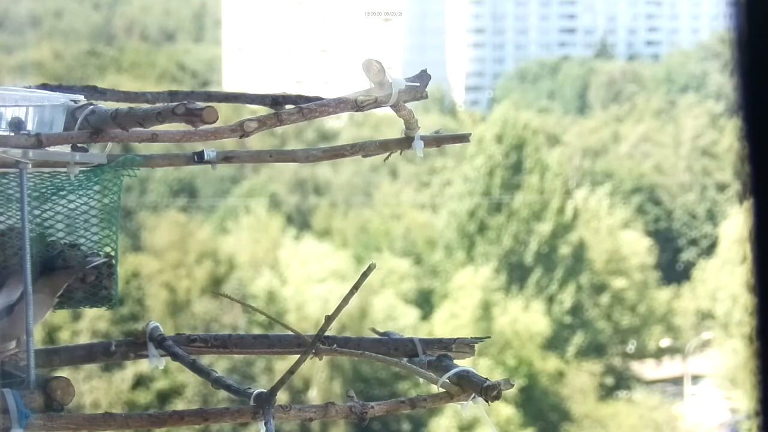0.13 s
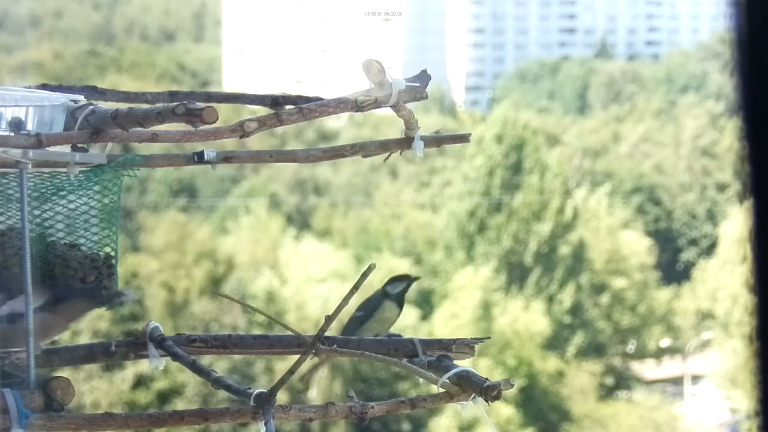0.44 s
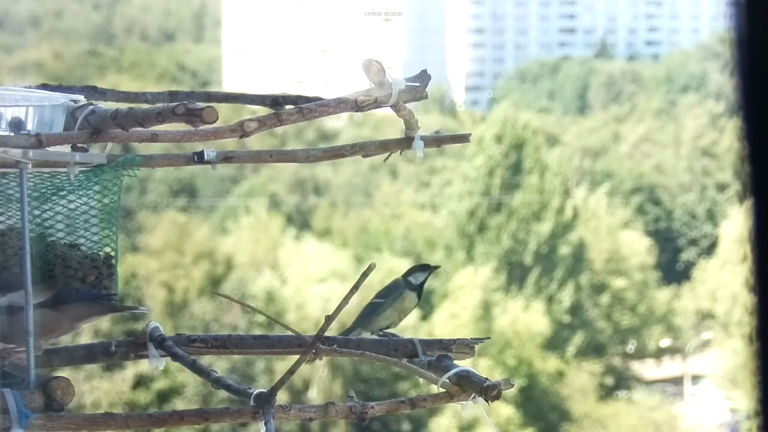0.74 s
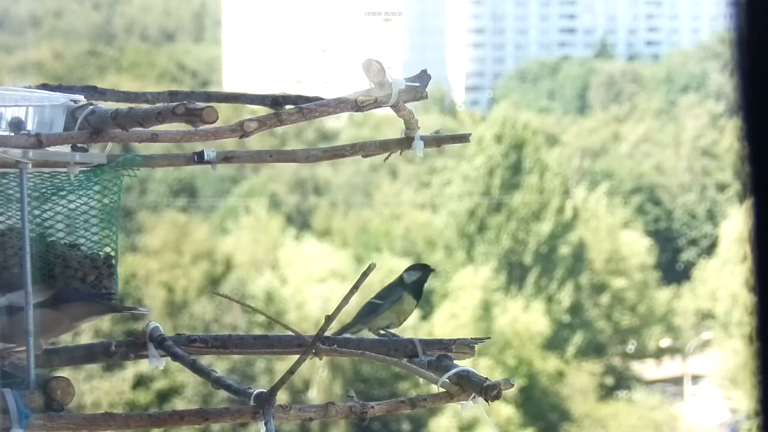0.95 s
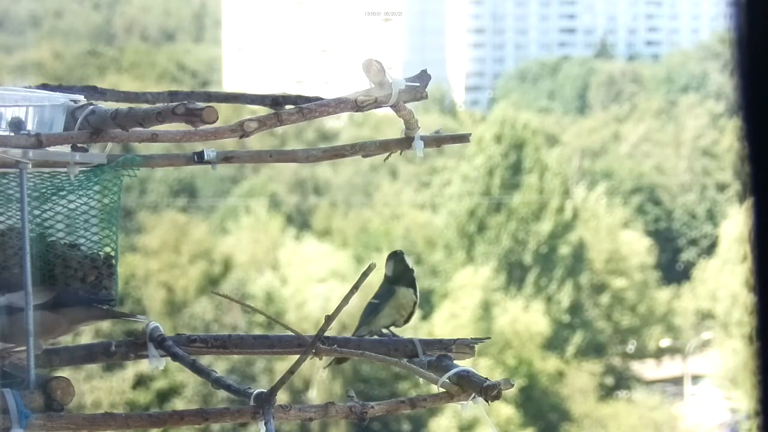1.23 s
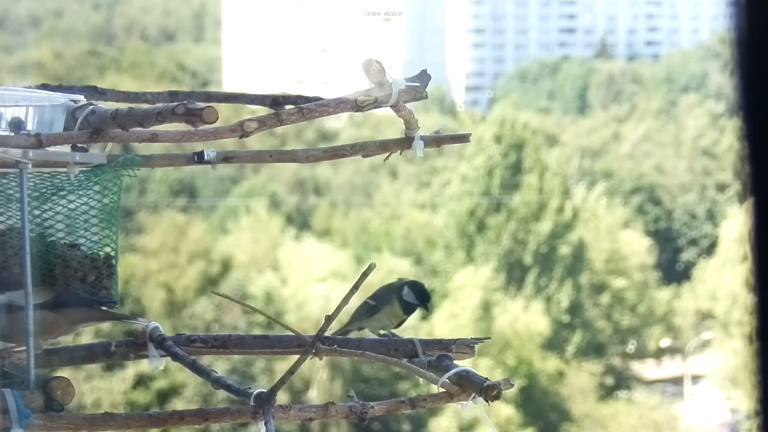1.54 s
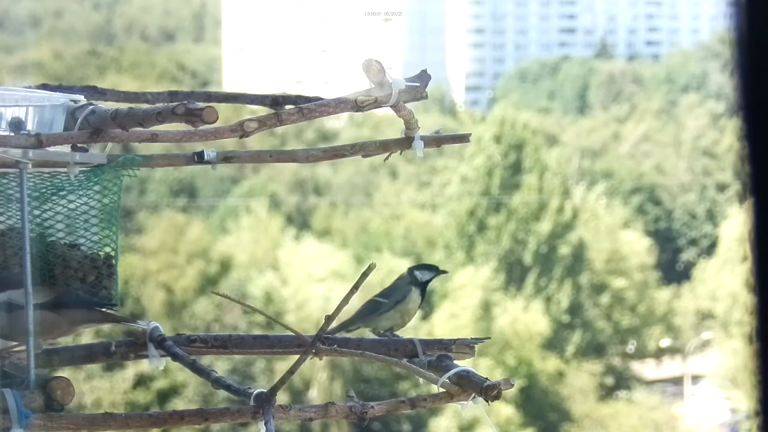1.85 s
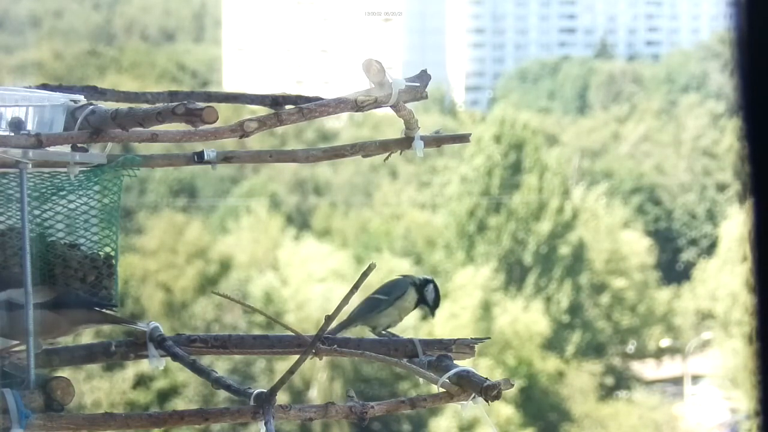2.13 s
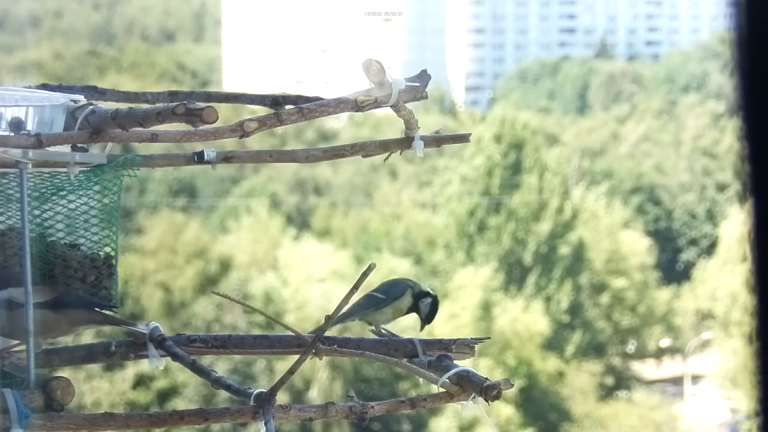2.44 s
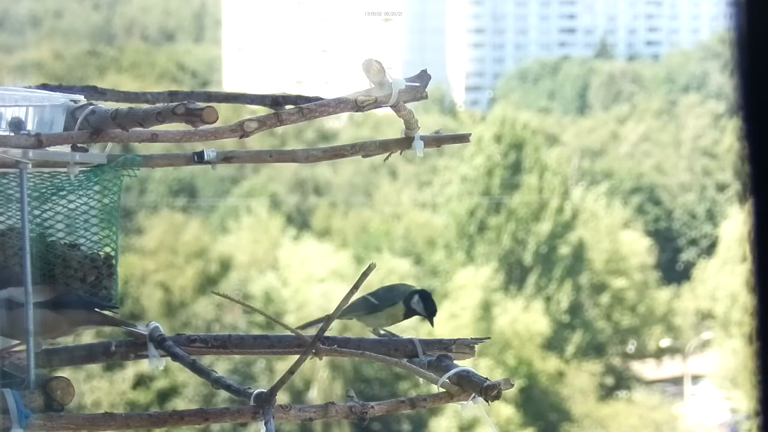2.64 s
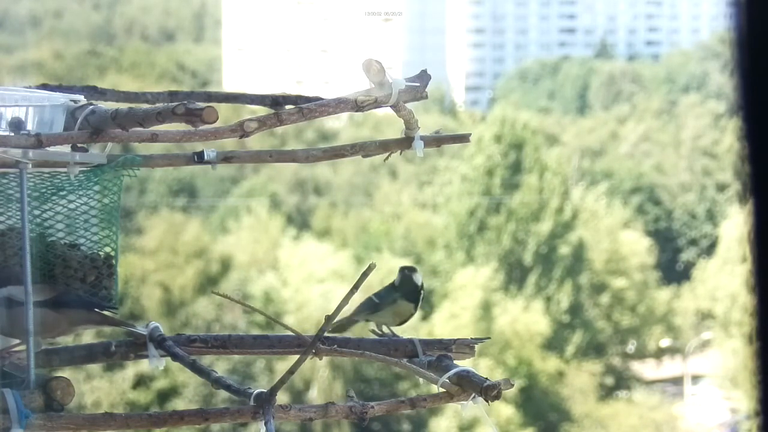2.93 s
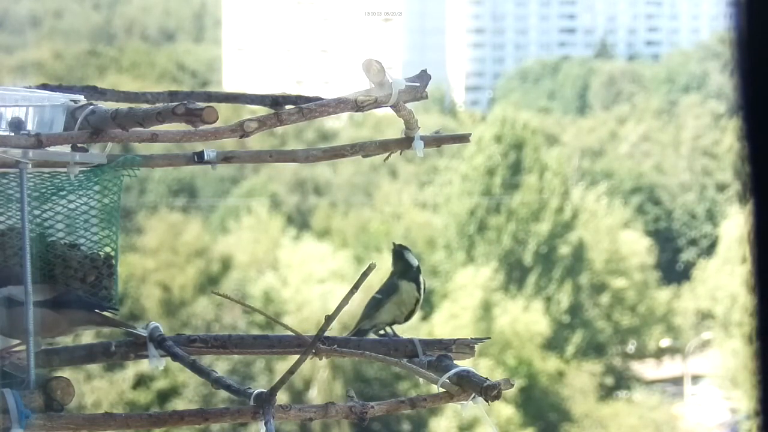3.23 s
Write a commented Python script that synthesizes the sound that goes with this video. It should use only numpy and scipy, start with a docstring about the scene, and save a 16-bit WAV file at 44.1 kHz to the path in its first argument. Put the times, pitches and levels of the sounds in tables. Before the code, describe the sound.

Small birds' beaks and claws tap sharply on a wooden feeder, hard knocks scattered among faint ticks and scratches; brief wing flutter late, then a hull crack. Close microphone outdoors, soft town murmur and hiss behind.

```python
"""Small birds at a wooden seed feeder

Beaks and claws tap close by as short filtered clicks; hulls splinter in dying runs of cracks, claws scratch.
Wings brush the feeder as grains through resonances. Behind lie shaped-noise town murmur and hiss, a faint hum
from a gliding sine and thin far bird calls from narrow noise. A limiter ducks everything after the sharpest taps.
"""
import sys
import numpy as np
from scipy import signal
from scipy.fft import rfft, irfft
from scipy.io import wavfile
from scipy.ndimage import uniform_filter1d, minimum_filter1d

SR = 44100
rng = np.random.default_rng(int(sys.argv[2]) if len(sys.argv) > 2 else 0)


def to_wav(sig):
    """Store sig (one row per channel, or 1-D mono) as 16-bit WAV at the path in sys.argv[1].

    Samples outside -1..1 are clipped; the rate is SR.
    """
    pcm = np.clip(np.atleast_2d(sig), -1, 1) * 32767
    pcm = np.round(pcm).astype(np.int16)
    wavfile.write(sys.argv[1], SR, pcm.T)  # frames by channels


N = 147735


def amp(db):
    """Turns dB into a linear factor."""
    return 10 ** (np.asarray(db) / 20)


def evened(x):
    """Scales to rms 1."""
    return x / np.sqrt(np.mean(x ** 2) + 1e-20)


def read(points, hz):
    """Reads a spectrum curve in dB on a log-frequency axis."""
    f, db = np.transpose(points)
    return np.interp(np.log(hz + 1), np.log(f + 1), db)


def add(mix, s, sound):
    """Mixes a sound in at time s, cutting whatever falls outside."""
    at = round(s * SR)
    sound = sound[max(-at, 0):]
    part = mix[max(at, 0):][:len(sound)]
    part += sound[:len(part)]


def colour(x, points):
    """Filters by a spectrum, keeping the power of white noise."""
    gain = evened(amp(read(points, np.fft.rfftfreq(len(x), 1 / SR))))
    return irfft(rfft(x) * gain, len(x))


def resonate(x, hz, width):
    """A resonance of gain 1 that can follow a pitch curve: shift to 0 Hz, smooth, shift back."""
    turn = np.exp(2j * np.pi * np.cumsum(hz * np.ones(len(x))) / SR)
    r = np.exp(-np.pi * width / SR)
    smoothed = signal.lfilter([1 - r], [1, -r], x / turn + 1e-18)
    return 2 * (turn * smoothed).real


def arch(length):
    """Half a sine, length seconds long."""
    return np.sin(np.linspace(0, np.pi, int(length * SR))).clip(0)


def strokes(rows):
    """Level curve of a set of strokes, each swelling and fading."""
    level = np.zeros(N)
    for start, length, db in rows:
        add(level, start, amp(db) * arch(length) ** 0.28)
    return level


def grains(rate, spread_db):
    """Random tiny impacts of uneven size and either sign, at a mean rate per second."""
    size = amp(spread_db * np.minimum(rng.exponential(1, N), 4))
    hits = rng.random(N) < rate / SR
    return evened(size * rng.choice([-1, 1], N) * hits)


def drift(count):
    """Slow random wandering, about rms 1."""
    smooth = uniform_filter1d(rng.standard_normal(N), size=700)
    return evened(uniform_filter1d(smooth, size=400))[:count]


def patchy(x):
    """Lets narrow bands of a noise swell and thin at random."""
    depth_db, frames, bins = 2, 9, 8
    z = signal.stft(x, nperseg=512, noverlap=384)[2]
    patches = uniform_filter1d(rng.standard_normal(z.T.shape).T, size=frames, axis=1)
    patches = uniform_filter1d(patches, size=bins, axis=0)
    z = z * amp(depth_db * evened(patches))
    return evened(signal.istft(z, nperseg=512, noverlap=384)[1][:N])


def murmur_and_hiss():
    """Town murmur as steady coloured noise, and hiss whose narrow bands flicker."""
    # Spectrum of the town murmur. Each row: frequency in Hz, relative level in dB per Hz.
    town_curve = [(18, -65), (54, -30), (355, -8), (439, -7.5), (650, -8.5), (995, 1.5), (1280, -5.5),
                  (1420, -6.5), (2100, -26), (2730, -56)]
    # Spectrum of the hiss. Each row: frequency in Hz, relative level in dB per Hz.
    hiss_curve = [(1800, -36), (2400, -18.5), (3000, -13), (3900, -5), (5500, -2), (7300, -4.5),
                  (8200, -11.5), (9300, -12), (11000, -14.5), (15300, -14)]
    town_db, hiss_db = -54, -48
    town, hiss = rng.standard_normal((2, N))
    return amp(town_db) * colour(town, town_curve) + amp(hiss_db) * patchy(colour(hiss, hiss_curve))


def hums():
    """Distant hum: a sine that sinks towards its last pitch while its level wavers."""
    # Swells of hum. Each row: start in seconds, length in seconds, first pitch in Hz,
    # pitch it settles towards in Hz, level in dB ahead of the background fader.
    hum_rows = [(-.08, 0.32, 450, 364.3, -59.5), (1.9, 0.54, 443, 366, -60)]
    settle_s, waver = .15, .6
    out = np.zeros(N)
    for start, length, first_hz, last_hz, db in hum_rows:
        swell = arch(length)
        t = np.arange(len(swell)) / SR
        pitch = last_hz + (first_hz - last_hz) * np.exp(-t / settle_s)
        tone = np.sin(2 * np.pi * np.cumsum(pitch) / SR)
        add(out, start, amp(db) * swell * evened(tone * (1 + waver * drift(len(swell)))))
    return out


def far_calls():
    """Thin, fuzzy far bird calls: noise through a narrow resonance whose pitch arches up and down."""
    # The calls. Each row: start in seconds, length in seconds, top pitch in Hz,
    # level in dB ahead of the background fader.
    call_rows = [(0.543, 0.35, 3650, -57.5), (1.634, .28, 3700, -53.5), (2.683, 0.32, 3690, -50.5)]
    dip, width_hz = 0.022, 380  # dip: share by which the pitch starts and ends below its top
    out = np.zeros(N)
    for start, length, top_hz, db in call_rows:
        swell = arch(length)
        pitch = top_hz * (1 - dip * (1 - swell))
        whistle = resonate(rng.standard_normal(len(swell)), pitch, width_hz)
        whistle = resonate(whistle, pitch, width_hz)
        add(out, start, amp(db) * swell * evened(whistle))
    return out


def distance():
    """Everything far away, riding on one slow background fader."""
    # Background fader. Each row: time in seconds, gain in dB.
    fader = [(0, -18.5), (.03, -7.5), (.07, -0.5), (2.0, 0.5), (2.6, 2), (2.8, 0)]
    gain_db = np.interp(np.arange(N) / SR, *np.transpose(fader))
    return (murmur_and_hiss() + hums() + far_calls()) * amp(gain_db)


def wings():
    """Feathers brush the feeder in rough strokes, each ringing its resonances a little differently."""
    # Wing strokes. Each row: start in seconds, length in seconds, level in dB, treble tilt in dB.
    wing_rows = [(0.431, 0.024, -48, -12), (2.121, 0.038, -51.5, -21), (2.442, .02, -47.5, 2),
                 (2.48, 0.025, -45.5, -8), (2.522, 0.034, -38.5, 3), (2.571, 0.012, -41, -1),
                 (2.585, 0.027, -45, -8)]
    # Resonances of the brushed feeder. Each row: nominal frequency in Hz,
    # width in Hz (doubled in each of two passes), relative level in dB ahead of the tilt.
    feeder_modes = [(495, 83, -3), (753, 165, -5), (1072, 48, 6.5), (1700, 110, -7.5), (2500, 120, -6),
                    (3220, 157, 4.5), (3630, 260, -10)]
    feathers_per_s, spread_db = 1500, 2.04
    pitch_shift, treble_hz = .018, 1000  # each stroke lands elsewhere and shifts the resonances
    out = np.zeros(N)
    for start, length, db, treble_db in wing_rows:
        swell = np.pad(arch(length) ** .5, (0, 1024))  # room to ring out
        brush = grains(feathers_per_s, spread_db)[:len(swell)] * swell
        ring = 0
        for hz, width, mode_db in feeder_modes:
            pitch = hz * (1 + pitch_shift * rng.standard_normal())
            # the tilt fades in over the octave around treble_hz
            tilt_db = treble_db * np.clip(np.log2(hz / treble_hz) + .5, 0, 1)
            mode = resonate(resonate(brush, pitch, 2 * width), pitch, 2 * width)
            ring += amp(mode_db + tilt_db) * mode
        add(out, start, amp(db) * ring * np.linalg.norm(swell) / np.linalg.norm(ring))
    return out


def claws():
    """Claws catch and slip over wood in short bursts of tiny impacts; seeds tick faintly throughout."""
    # Claw scratches. Each row: start in seconds, length in seconds, level in dB.
    scratch_rows = [(.044, 0.014, -46), (.191, 0.0027, -36.5), (.422, 0.031, -45), (.503, 0.018, -37),
                    (.579, 0.018, -33), (.622, .012, -39), (.805, 0.04, -41.5), (1.33, 0.011, -37),
                    (1.456, 0.0047, -33), (1.615, 0.082, -50), (1.835, 0.046, -43.5), (1.935, 0.037, -39.5),
                    (2.12, 0.046, -45), (2.308, 0.02, -33.5), (2.382, 0.015, -38), (2.45, 0.035, -40),
                    (2.52, 0.028, -37.5), (2.58, 0.017, -32), (2.648, 0.036, -40.5), (2.722, 0.027, -40),
                    (2.798, 0.021, -41.5), (2.874, 0.017, -32.5)]
    # Spectrum of scratches and ticks. Each row: frequency in Hz, relative level in dB.
    scratch_curve = [(1000, -23.5), (2000, -19), (3000, -14.5), (4500, -2.5), (6000, 8), (7500, 4.5),
                     (9500, -1), (12000, -23.5), (16000, -18)]
    slips_per_s, slip_spread_db = 1800, 3
    ticks_per_s, tick_spread_db, ticks_db = 70, 2.5, -59
    slips = grains(slips_per_s, slip_spread_db) * strokes(scratch_rows)
    ticks = amp(ticks_db) * grains(ticks_per_s, tick_spread_db)
    return colour(slips + ticks, scratch_curve)


def thump():
    """One short, dull push of air under a hard tap: a one-sided pulse that jumps up and decays."""
    # The pulse: start in seconds, level in dB (it peaks 6 dB lower), time scale in seconds.
    s, db, length = (.25, -18, 0.00016)
    out = np.zeros(N)
    u = np.arange(1024) / SR / length
    add(out, s, amp(db) * u * np.exp(1 - 2 * u))
    return out


def click(db, centre, width, crack_db, body_db):
    """One contact: a very short ring with a hard crack and a woody body, coloured by the spot struck."""
    # Spectrum of the woody body. Each row: frequency in Hz, level in dB ahead of the tap's own body level.
    body_curve = [(100, -37), (900, -11), (2000, -16.5), (2900, -8), (4500, -2), (9000, -17.5)]
    # Spectrum of the hard crack. Each row: frequency in Hz, level in dB ahead of the tap's own crack level.
    crack_curve = [(2000, -48), (5500, -7), (10000, -1.5), (12000, -4), (15000, 2.5), (17000, -11)]
    spot_db, spot_width_hz = 3.5, 701  # every struck spot has resonances of its own
    contact_s = .00007  # soft meeting of beak and wood: each frequency is delayed by about twice this
    trim_db = 1  # of all contacts
    hz = abs(np.fft.fftfreq(2048, 1 / SR))
    ring = 1 / (1 + ((hz - centre) / width) ** 4)
    body = amp(body_db + read(body_curve, hz))
    crack = amp(crack_db + read(crack_curve, hz))
    spot = np.interp(hz / spot_width_hz, np.arange(128), rng.standard_normal(128))
    gain = (ring + body + crack) * amp(spot_db * spot)
    build_up = np.exp(-2j * np.pi * np.cumsum(np.diff(hz, prepend=0) * contact_s * (2 + spot)))
    # minimum phase puts the energy as early as the spectrum allows
    spectrum = np.exp(np.conj(signal.hilbert(np.log(gain)))) * build_up
    sound = np.roll(irfft(spectrum[:1025]), 10)[:400] * signal.windows.tukey(400, .04)
    return sound * amp(db + trim_db) / abs(signal.hilbert(sound)).max()


def aftermath(db):
    """What follows a contact: a brief rattle, one echo off the nearest surface and a faint tail."""
    rattle_db, rattle_t60, tail_db, tail_t60 = -8, 0.016, -16, 0.046  # times in seconds
    soft_tap_db, rattle_slope = -18.5, -0.46  # harder taps are cleaner: dB of rattle per dB of strength
    echo_s, echo_db = .0038, -17.5
    t = np.arange(2048) / SR
    decays = amp(-60 * t / np.array([[rattle_t60], [tail_t60]]))
    rattle, tail = rng.standard_normal((2, len(t))) * (t > .0003) * decays
    rattle_gain = amp(rattle_db + rattle_slope * (db - soft_tap_db))
    path = rattle_gain * rattle / np.linalg.norm(rattle) + amp(tail_db) * tail / np.linalg.norm(tail)
    path[0] += 1  # the contact itself
    path[round(echo_s * SR)] += amp(echo_db)
    return path


def taps():
    """Single taps of beak and claw on wood, each a click with its rattle, echo and tail."""
    # The taps. Each row: start in seconds, peak level in dB ahead of the common trim, ring centre in Hz,
    # ring half-width in Hz, level of the hard crack in dB, level of the woody body in dB.
    tap_rows = [(0.0994, -18, 6800, 1630, -16, -19), (0.227, 3, 7220, 1530, -30, -18),
                (0.249, 4.5, 6770, 1830, -5, -31), (0.2899, -7.5, 6900, 1030, -15.5, -44),
                (0.3226, -18, 7200, 1170.0, -16, -5), (0.5096, -15.5, 5870, 1480, -10.5, -3.5),
                (0.5562, -12.5, 7580, 1240, -22, -30), (0.5848, -2, 6470, 1250, -19.5, -48),
                (0.588, -6, 7600, 1410, -27, -26), (0.6292, -11.5, 6830, 1010, -23, -22),
                (0.7084, -19, 7400, 810.0, -9, -8), (0.8335, -13.5, 7180, 1260, -26, -29),
                (0.9169, -17, 6380, 820, -29, -13), (1.048, -18, 7440, 1260.0, -9, -29),
                (1.0741, -11.5, 8020, 1170.0, -16, -18), (1.134, -12, 6820, 810.0, -32, -29),
                (1.2361, -15, 6940, 1160, -34, -13.5), (1.332, -20.5, 7130, 1170.0, -31, -17),
                (1.4431, -11.5, 6240, 1080, -46.5, -12.5), (1.5966, -18.5, 6100, 1070, -19, -18),
                (1.6499, -16, 6160, 910, -35, -21), (1.6925, -18.5, 7360, 900.0, -35, -18),
                (1.6996, 3.5, 6300, 900, -17.5, -18.5), (1.7896, -19.5, 6300, 900, -30, -10),
                (1.8415, -18.5, 6500, 1080.0, -10, -26), (1.8674, -18.5, 7040, 990.0, -30, -15),
                (1.9383, -17, 6300, 1620.0, -32, -14), (1.989, 2, 6720, 1350, -28, -27),
                (2.0231, 6, 7140, 1310, -16, -21.5), (2.2367, -19, 6500, 1710.0, -19, -15),
                (2.2558, -15.5, 7070, 1150, -16.5, -37), (2.4697, -18.5, 6000, 1470, -16, -10),
                (2.5214, -18, 6100, 1530.0, -27, -4), (2.5881, -16.5, 6500, 1530.0, -11, -9),
                (2.5992, -20, 6660, 1170.0, -23, -20), (2.65, -16, 7000, 1480, -15, -30),
                (2.6638, -16.5, 6600, 990.0, -27, -19), (2.7245, -17.5, 7260, 1960, -15, -15),
                (2.7386, -16.5, 6040, 2100, -16, -30), (2.8782, -19.5, 6200, 1520, -38, -10),]
    out = np.zeros(N)
    for s, db, *tone in tap_rows:
        add(out, s, signal.fftconvolve(click(db, *tone), aftermath(db)))
    return out


def hulls():
    """Seed hulls splinter: one click repeated in a quick, dying run of random cracks."""
    # The crunches. Each row: start in seconds, level in dB ahead of run scaling and trim, ring centre in Hz,
    # ring half-width in Hz, crack level in dB, woody body level in dB, decay of the run in seconds.
    crunch_rows = [(.418, -24, 5530, 2180, -1.5, 4, 0.0024), (.438, -27.5, 6200, 1700, -8, -4, 0.0017),
                   (1.0806, -8.5, 7300, 1210, -13, -7, 0.00056),
                   (1.5315, -14.5, 7240, 1330, -31, -25.5, 0.0015),
                   (3.0484, -2, 8570, 1820, -20, -11.5, 0.00087),
                   (3.057, -11, 7600, 1290, -6, -12, 0.00063)]
    cracks_per_s = 5000
    out, t = np.zeros(N), np.arange(1024) / SR
    for s, db, *tone, decay in crunch_rows:
        hits = (rng.random(len(t)) < cracks_per_s / SR) | (t == 0)
        cracks = rng.choice([-1, 1], len(t)) * np.exp(-t / decay) * hits
        # hold each run at its expected energy
        cracks *= np.sqrt(1 + cracks_per_s * decay / 2) / np.linalg.norm(cracks)
        run = np.convolve(click(db, *tone), cracks)
        add(out, s, signal.fftconvolve(run, aftermath(db)))
    return out


def scene():
    """Birds at the feeder over the distant background."""
    return (distance() + wings() + claws() + thump() + taps() + hulls())[None]


def record(dry):
    """A peak limiter that clamps at once and recovers steadily; the microphone's notch and the band limit."""
    ceiling_db, recover_db_per_s = -6, 102.5
    notch_hz, notch_width_hz = 2093, 177  # the microphone's dead spot
    edge_hz = 16100
    over_db = np.maximum(20 * np.log10(abs(dry[0]) + 1e-9) - ceiling_db, 0)
    over_db = -minimum_filter1d(-over_db, size=41)  # widen each peak to both sides
    fall = np.arange(N) * recover_db_per_s / SR
    duck_db = np.maximum.accumulate(over_db + fall) - fall
    duck_db = uniform_filter1d(duck_db, size=21)
    notched = signal.lfilter(*signal.iirnotch(notch_hz, notch_hz / notch_width_hz, SR), dry)
    edge = signal.firwin(255, edge_hz, window=("kaiser", 9), fs=SR)
    return signal.oaconvolve(notched * amp(-duck_db), edge[None], "same")


dry = scene()
out = record(dry)
to_wav(out)
```